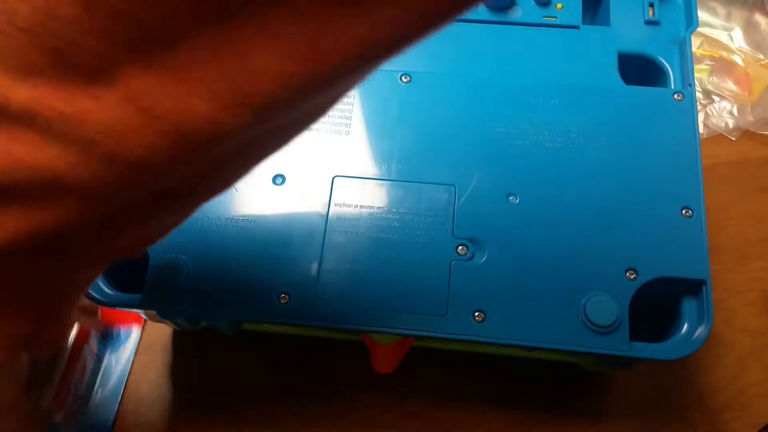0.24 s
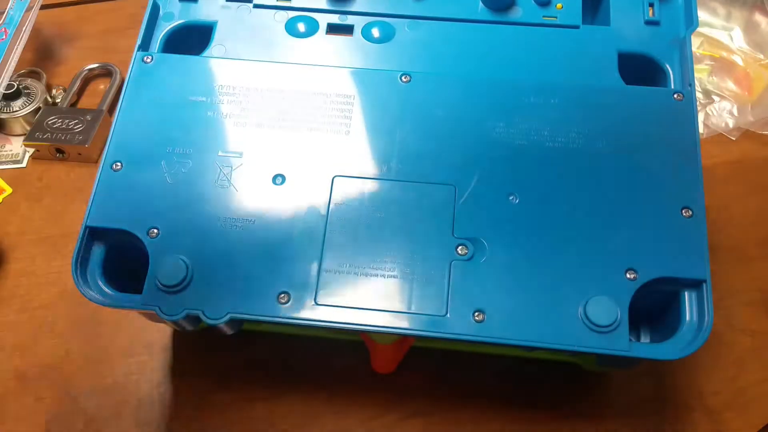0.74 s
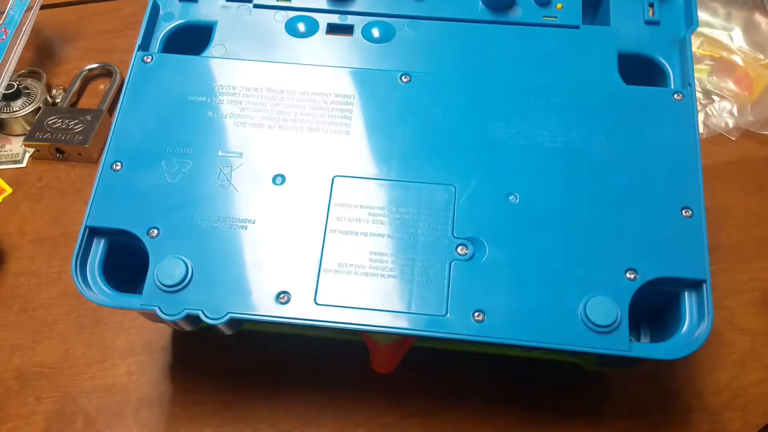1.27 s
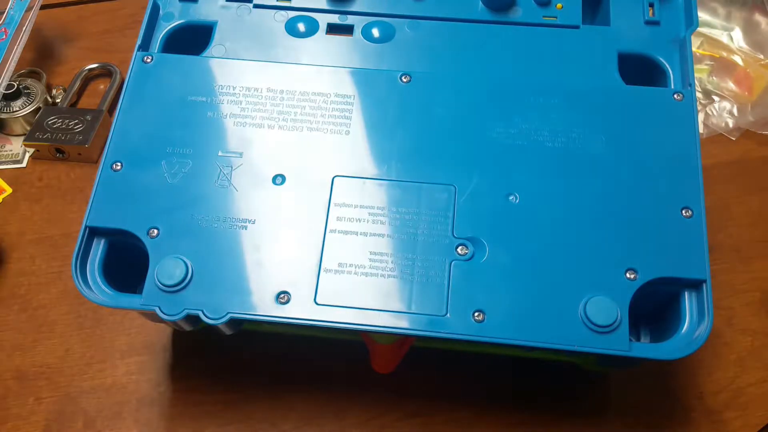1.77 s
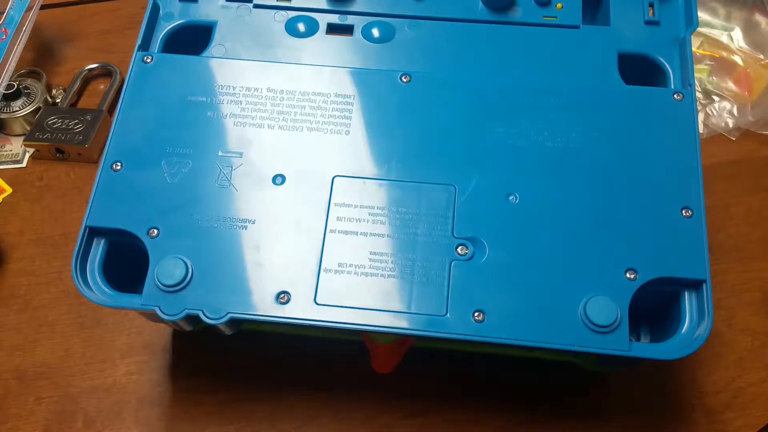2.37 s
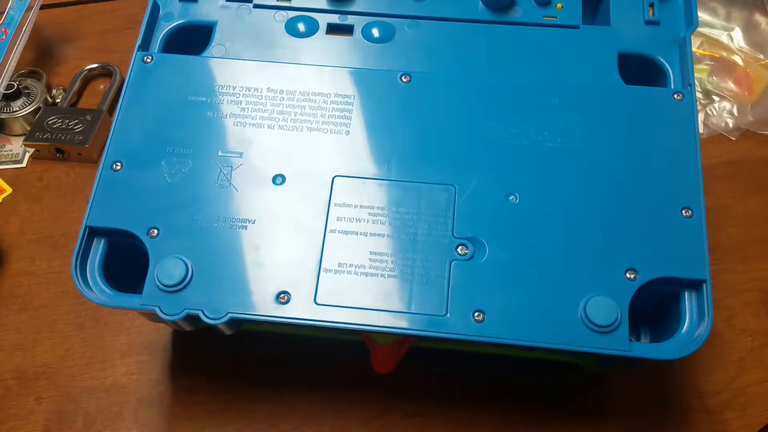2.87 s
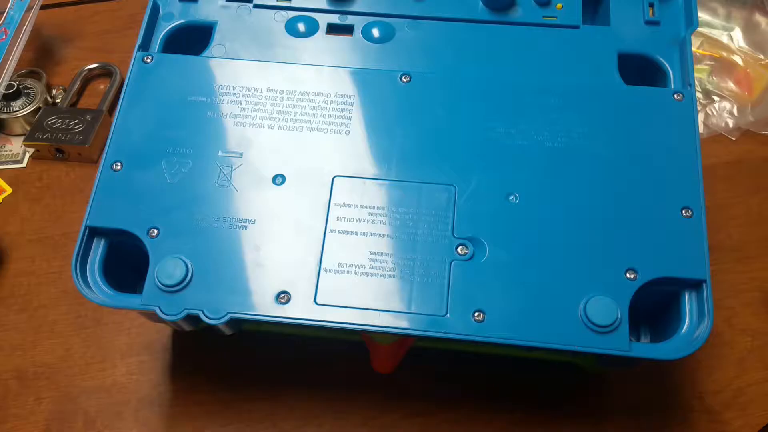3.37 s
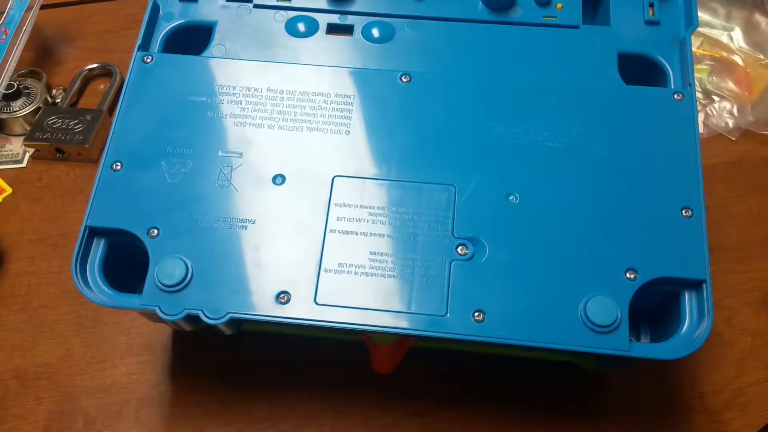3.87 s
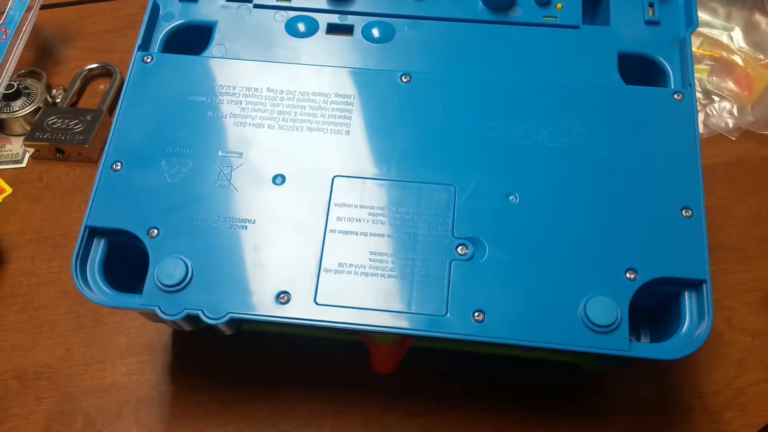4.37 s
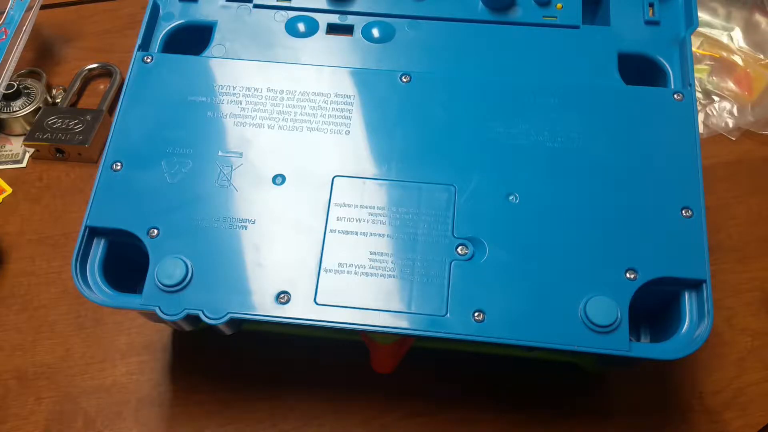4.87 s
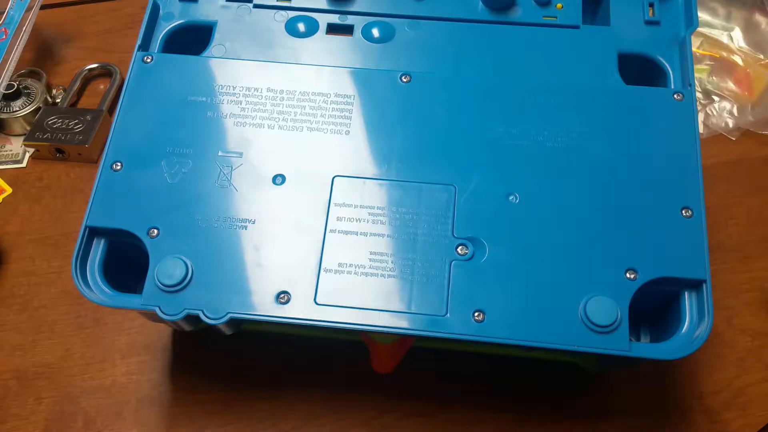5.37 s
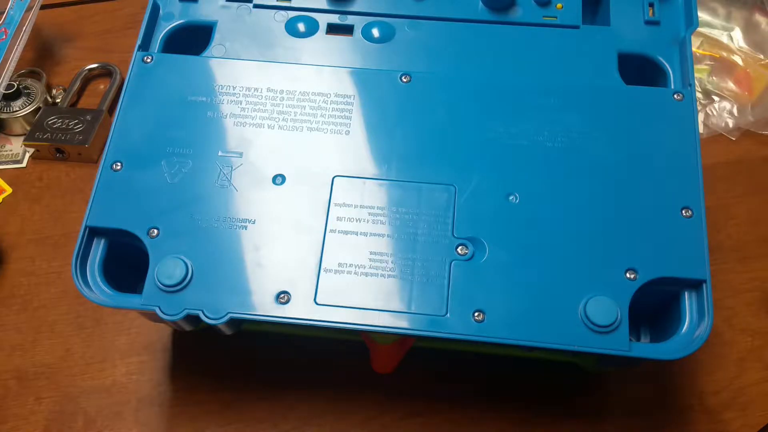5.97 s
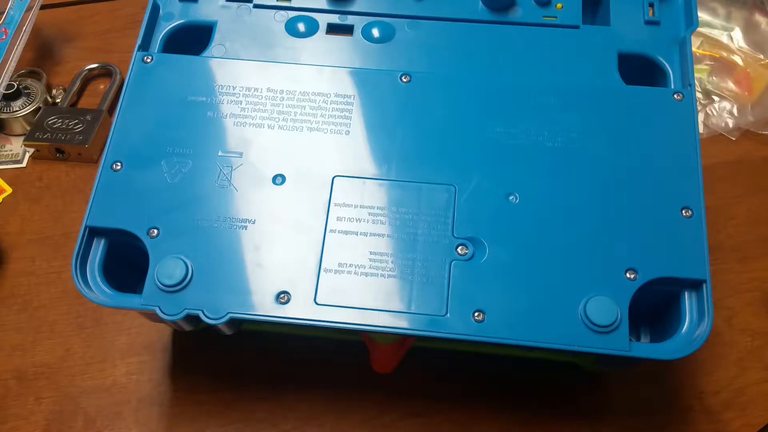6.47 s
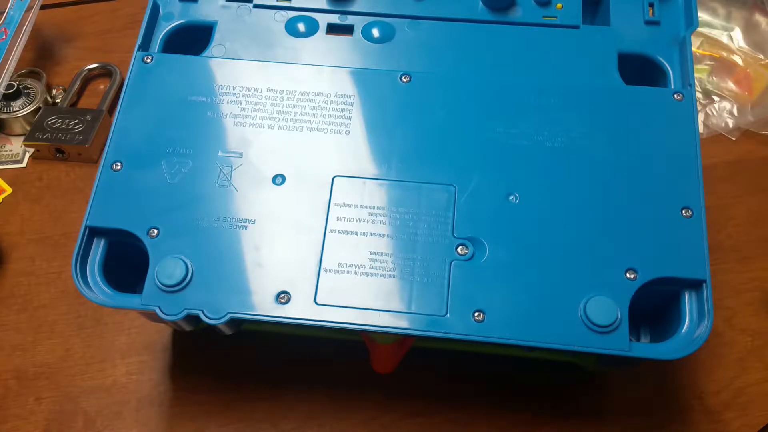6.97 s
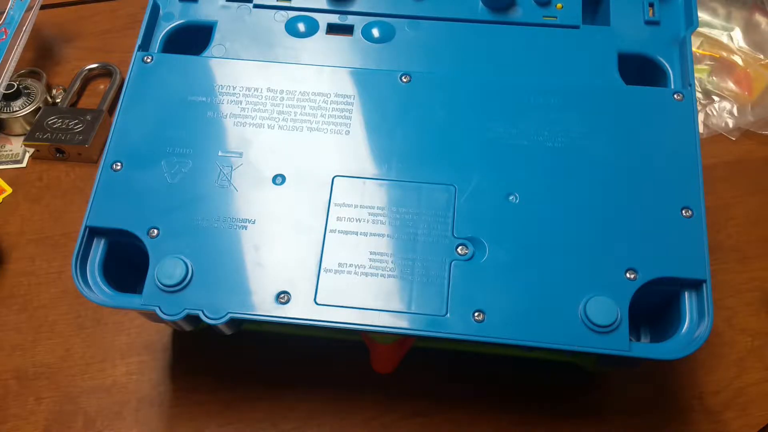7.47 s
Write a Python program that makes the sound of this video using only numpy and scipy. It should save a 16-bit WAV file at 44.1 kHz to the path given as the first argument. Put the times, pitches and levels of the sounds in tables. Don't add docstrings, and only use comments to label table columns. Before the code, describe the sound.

Close, dry handling noise: fingers brush lightly over packaging, then grip and bend it. Snaps start around two seconds, pause into rubbing and creaking, then grow dense and loud from the middle onward, as stiff plastic tears and card knocks dully. Small ticks and crinkles trail off at the end. Behind it lie soft room air and a distant motor hum; the loudest cracks slightly overload the microphone.

```python
import sys
import numpy as np
from scipy import signal
from scipy.io import wavfile

SR = 44100
rng = np.random.default_rng(int(sys.argv[2]) if len(sys.argv) > 2 else 0)


def gain_from_db(level_db):
    decades = np.asarray(level_db, float) / 20
    return 10 ** decades


def output_pcm(signal):
    pcm = np.clip(np.atleast_2d(signal).T, -1, 1) * 32767
    wavfile.write(sys.argv[1], SR, np.round(pcm).astype(np.int16))


N = 341276

# f/Hz, level/dB per Hz
AIR_SPECTRUM = [(25, -16), (60, -11), (82, -31), (100, -19), (130, -9), (220, -2.5), (330, -6.5),
                (450, -11), (1400, -25.5), (3300, -29.5), (7000, -35.5), (15000, -37.5), (16500, -58)]
AIR_DB = -55
# f/Hz, correlation
AIR_LIKENESS = [(60, .92), (130, .97), (280, .9), (600, .4), (15000, .1)]
# f/Hz, level/dB, width/Hz
HUM_LINES = [(59.5, -69, 4.4), (117.9, -61.5, 3.5), (160, -70.5, 3.1), (199.5, -59, 10.5), (234, -62, 8.7),
             (299, -60, 3.1)]
# f/Hz, t60/s
ROOM_DECAY = [(250, 0.086), (1000, 0.35), (3000, 0.22), (8000, 0.25), (15000, 0.16)]

# t/s, left minus right level/dB
PACK_PAN = [(0.0, 7.5), (0.56, -17), (0.6, 1), (1.55, -1), (1.68, -6.5), (2.54, -12.5), (3.23, -6),
            (5.17, -7.5), (5.62, -12), (6.12, -9.5), (7.74, -19)]
LIFTED_S = 1.7
PORT_LAG = 16

# f/Hz, width/Hz, level/dB
CARD_MODES = [(322, 940, 7), (577, 820, 20.5), (800, 1230, 12.5)]
SHELL_MODES = [(1300, 2400, 3), (2410, 2650, 4.5), (3540, 2200, -4)]
SCUFF_MODES = [(6500, 2300, 17.5), (9700, 3800, 11.5), (12500, 20200, 11)]
TABLE_MODES = [(136, 110, -8), (151.5, 28, 0), (224.4, 188, 7.5)]

# t/s, length/s, f/Hz, width/Hz, level/dB
GROANS = [(1.686, 0.024, 450, 97.2, -45.5), (4.885, 0.024, 766, 150, -34.5), (5.494, 0.1, 2410, 400, -36.5),
          (5.54, 0.0906, 496, 40, -32), (5.84, 0.22, 156, 24.6, -42), (6.716, 0.13, 120, 32.41, -42.5),
          (6.72, 0.17, 295, 80, -42), (7.501, 0.041, 800, 300, -36.5), (2.93, .06, 110, 30, -49),
          (2.965, .06, 210, 40, -49), (3.22, .12, 230, 30, -47), (3.25, .07, 70, 30, -55),
          (3.72, .16, 504, 20, -40), (3.73, .13, 690, 60, -39), (4.03, .07, 70, 30, -55),
          (4.1, .06, 700, 250, -41), (4.32, .06, 450, 200, -36), (3.49, .04, 330, 300, -39),
          (6.7, .14, 55, 25, -54), (7.225, .06, 3350, 600, -43), (2.096, .022, 850, 120, -35),
          (6.72, .18, 420, 250, -42), (3.53, .06, 5600, 900, -45), (4.215, .08, 650, 200, -38)]

# t/s of deepest bend, level/dB, rise/s, fall/s
FLEXES = [(0, -43.5, .1, 0.29), (1.05, -52, 0.27, 1), (1.376, -46.5, 0.14, .065),
          (2.045, -51.5, 0.11, 0.037), (2.19, -54.5, 0.26, 0.38), (2.386, -42, .03, 0.068),
          (2.628, -53.5, 0.21, 0.13), (3.0, -44, .12, 0.23), (3.266, -39, 0.054, .17),
          (3.501, -38, 0.022, 0.23), (3.783, -31, 0.11, 0.17), (4.131, -36, .04, 0.088),
          (4.22, -32, 0.04, 0.15), (4.335, -35.5, .015, 0.11), (4.508, -42, 0.099, 0.24),
          (4.687, -36, 0.091, 0.1), (4.8, -51, .08, 0.021), (4.902, -45, .02, 0.17),
          (5.08, -39.5, 0.24, 0.26), (5.19, -37, 0.024, 0.11), (5.583, -28, 0.064, 0.12),
          (5.78, -52, 0.098, .4), (5.973, -41.5, 0.099, 0.076), (6.45, -45, 0.3, 0.33),
          (6.587, -39, 0.03, .17), (6.787, -41.5, 0.12, .085), (6.905, -54, 0.14, 0.12),
          (7.104, -61, .04, .055), (7.29, -51, 0.016, .09), (7.524, -44.5, 0.14, 0.35)]
# t/s of fastest slide, rub level/dB, scuff level/dB, rise/s, fall/s
SLIDES = [(1.0, -51, -56, 0.53, 2.5), (1.376, -42.5, -44.5, 0.15, 0.1), (1.932, -46.5, -43, .16, 0.042),
          (2.16, -45.5, -46, 0.11, 0.22), (2.628, -38, -36, 0.19, 0.082), (2.95, -41.5, -48.5, 0.28, 0.27),
          (3.269, -39, -52, 0.07, 0.051), (3.784, -30, -35, 0.25, 0.12), (4.128, -36.5, -40, 0.04, 0.06),
          (4.687, -36.5, -60, 0.12, 0.094), (4.87, -43.5, -48.5, .15, 0.43),
          (5.584, -35.5, -36.5, 0.11, 0.043), (5.92, -38.5, -47, 0.14, 0.13), (6.72, -50, -44.5, .2, 0.15),
          (7.252, -42, -35, 0.054, 0.071), (7.358, -40.5, -43, 0.3, 0.79)]
# t/s, rub level/dB, scuff level/dB, fall/s
SLIPS = [(0, -48.5, -52.5, 0.5), (.984, -40, -52, 0.091), (2.045, -41, -53, .02), (2.395, -44, -60, 0.13),
         (3.5, -40, -46, 0.1), (3.545, -39, -39, 0.1), (4.21, -36, -38, .22), (4.508, -40, -40, 0.21),
         (5.095, -39, -35, 0.1), (5.19, -29, -33, 0.11), (5.497, -33.5, -34.5, 0.27),
         (5.769, -39.5, -46, 0.29), (6.12, -45, -45, 0.19), (6.351, -42, -39, 0.29),
         (6.587, -35.5, -41, 0.21), (6.905, -34, -38, 0.064), (7.11, -32, -34, 0.075),
         (7.524, -33, -38.5, 0.12)]
SLIP_RISE_S = 0.032
# t/s, level/dB, swell/s
THUDS = [(0, -43.5, 0.52), (1.376, -50, .06), (2.104, -54, 0.16), (2.5, -52, .15), (2.955, -51, 0.17),
         (3.28, -48, 0.057), (3.513, -31, 0.028), (3.612, -39.5, .17), (4.061, -52, 0.041), (4.3, -47, 1),
         (5.093, -41.5, 0.048), (5.249, -42, 0.14), (5.6, -39, 0.14), (5.822, -43, 0.2), (6.24, -42, 0.2),
         (6.6, -46.5, 0.6), (6.8, -39, 0.15), (7.195, -50, 0.054), (7.524, -58, 0.11)]
STROKE_DROP_DB = 15
REST_FLEX_DB, REST_RUB_DB, REST_SCUFF_DB, REST_THUD_DB = -80.5, -70, -65, -66

# t/s, peak level/dB, shell f/Hz, crack level/dB, card level/dB
KNOCKS = [(2.226, -12, 1850, -8, -7), (2.0985, -16, 3400, -12, 12), (4.4889, -16, 1860, -2.5, 1.5),
          (4.5148, -9.5, 3200, -2, 9.5), (4.534, -20, 2000, -10, 8), (5.035, -28, 2000, -12, 10),
          (4.7967, -15, 1960, -27, 1), (5.0713, -8.5, 3140, -10, 9), (5.1017, -6.5, 3380, -7.5, -8),
          (5.182, -5, 3450, -3.5, 4), (5.1935, -2.5, 4200, -2.5, -5), (5.1994, -6, 3460, 1, -8),
          (5.5252, -13, 4940, 8, 15), (5.939, -15.5, 2640, -7, -1), (5.9736, -14, 3230, -3, 12.5),
          (6.1011, -10, 3030, 8, -10), (6.115, -9, 2860, 17, -5), (7.4239, -12, 2860, -3, 1.5),
          (7.642, -13.5, 4670, 1.5, -5.5)]
# t/s, peak level/dB, shell f/Hz, crack level/dB, card level/dB
POPS = [(1.9767, -12.5, 2580, -18, 1.5), (2.0348, -7.5, 2000, -10.5, -4), (2.0495, -11, 1980, -12, 3.5),
        (2.3887, -5.5, 2470, -8.5, -2), (2.9025, -7.5, 1780, -7.5, -5.5), (3.9658, -5.5, 1870, -3, 9.5),
        (4.7876, -11.5, 3350, -18, -0.5), (5.7591, -7.5, 2020, -30, -6), (6.8458, -17.5, 4800, 7, -7),
        (6.8844, -13, 3400, 0, -14), (6.903, -16, 3980, -4, -8), (7.0932, -12, 1800, -23, -7),
        (7.3705, -9, 4080, 6.5, -6.5)]
FACE_HZ, EDGE_HZ = 960, 1402
# t/s, peak level/dB, shell f/Hz, crack level/dB
CRACKS = [(3.6844, -12.5, 5000, -8), (4.0415, -18.5, 2350, -20), (4.2165, -12.5, 3000, -14),
          (5.925, -21, 5000, 8), (5.9321, -19, 4700, -17), (5.963, -19.5, 2930, -30),
          (5.9949, -13, 2630, -30), (6.126, -13, 4790, 14), (6.9452, -7.5, 4530, 14),
          (7.0338, -9, 4700, 9.5), (7.1032, -14, 2800, -10), (7.2682, -14, 3400, -15),
          (7.3085, -21, 1490, 8), (7.5985, -14.5, 4180, -26)]
FREE_KNOCK_DB = -29
# t/s, peak level/dB, shell f/Hz
CREASES = [(2.624, -24, 1280), (2.637, -24.5, 1420), (2.8999, -20, 1800), (3.3844, -27, 1790),
           (3.7031, -19.5, 1960), (4.6792, -29, 1550), (4.793, -12.5, 1950), (4.895, -24.5, 1440),
           (5.1777, -12.5, 2720), (5.4996, -15, 2010), (6.5794, -19, 1800), (6.5862, -18, 1860),
           (7.342, -27, 1840), (7.507, -28, 1350), (7.5216, -19, 1560), (7.5657, -25, 3080),
           (7.5836, -23, 1580), (7.6933, -24, 1930)]
CREASE_BRIGHT_DB = -4.5
# t/s, peak level/dB, crack level/dB
TICKS = [(1.9624, -21, 21), (2.365, -15.5, 2), (2.552, -23.5, 3), (2.6193, -22, 13), (2.959, -21.5, -3),
         (3.6591, -23, 4), (4.082, -25.5, -4), (5.764, -24, 3), (5.8765, -17.5, -6), (5.906, -20.5, 0),
         (5.944, -21, 1), (6.136, -15.5, 12), (6.1426, -19, 13), (6.1483, -20.5, 9), (6.9089, -20, 8),
         (7.152, -20, 16), (7.1639, -22, 3), (7.2013, -22, -6), (7.2149, -21, 3), (7.2574, -21.5, -10),
         (7.301, -22, -5), (7.3236, -20, -2), (7.3466, -18, 5), (7.3513, -21.5, 2), (7.364, -19, 10),
         (7.5177, -17, -3)]
FILM_HZ, SEAM_HZ = 3480, 4200
# start t/s, end t/s, gap/s, peak level/dB, crack level/dB
PEELS = [
    (6.155, 6.186, 0.0057, -27, 9),
    (7.239, 7.247, .0039, -21.5, -5),
    (7.543, 7.551, .004, -23.5, -5),
]
# t/s, peak level/dB
SPECKS = [(1.8233, -41), (1.9182, -38), (2.5192, -33), (2.5694, -35), (3.4665, -44), (5.1714, -32),
          (5.461, -37), (5.4764, -38), (5.7009, -37), (5.7744, -33), (5.7824, -34), (5.7894, -33),
          (5.7954, -35), (5.8354, -35), (5.8404, -34), (5.8524, -35), (5.9155, -27), (6.4094, -34),
          (6.4144, -36), (6.4254, -36), (6.4384, -36), (6.4434, -37), (6.4634, -39), (6.4961, -38),
          (6.5044, -38), (6.5094, -38), (6.5144, -37), (6.6864, -40), (6.6924, -38), (6.7037, -34),
          (6.7306, -37), (6.755, -38), (7.1324, -31), (7.2204, -33), (7.2284, -31), (7.272, -25),
          (7.3114, -34), (7.3164, -32), (7.3844, -32), (7.7094, -36)]
SPECK_DB, SPECK_BRIGHT_DB, SPECK_CRACK_HZ = 5, 10, 7400
# t/s, peak level/dB, shell f/Hz
FLICKS = [(3.0574, -36, 2090), (3.1971, -42, 2510), (3.2625, -35, 3050), (3.496, -34, 2610),
          (3.5414, -30, 5420), (3.5554, -29, 5650), (3.8004, -25, 3090), (3.8144, -27, 2570),
          (3.9904, -37, 5000), (4.0494, -32, 2440), (4.0574, -29, 2470), (4.1056, -37, 2540),
          (4.123, -32, 2540), (4.1964, -33, 2050), (4.2114, -29, 2940), (4.3614, -38, 5500),
          (4.4214, -40, 2350), (4.4614, -38, 4500), (5.0429, -39, 2760), (5.8092, -27, 2800),
          (5.8244, -31, 3800), (5.8944, -26, 4820), (6.3924, -32, 3000), (6.5276, -35, 3500),
          (7.0718, -27, 5900), (7.1374, -31, 3440), (7.1764, -25, 3130), (7.3044, -28, 3440),
          (7.4154, -31, 2770), (7.4514, -31, 3140), (7.4764, -32, 2570), (7.5934, -28, 2670),
          (7.6384, -26, 2400), (7.6745, -32, 2360)]
FLICK_DB, FLICK_BRIGHT_DB, FLICK_LATE_S = 5, -8, 0.0007
# t/s, peak level/dB, shell f/Hz, crack level/dB, crack f/Hz
BANGS = [(6.3363, -2.5, 1750, 9, 6500), (6.5764, -2, 1900, 1, 5300), (6.5788, -6, 1900, -8, 6800),
         (5.4916, -4.5, 2300, -3, 4500), (4.8123, -5, 2900, 3, 5000), (4.5078, -8, 2270, -1, 5000),
         (4.669, -4, 2300, 1, 3700), (0.9741, -9, 1300, -11, 3200), (3.7715, -13, 2480, 2, 5400),
         (3.8396, -14.5, 2900, 2, 5000), (6.794, -11.5, 3350, -4, 5000), (2.0956, -8, 3450, -3, 5600)]
BANG_KNOCK_DB = -9
BANG_TOP_DB, SPECK_TOP_DB = -16, -5


def evened(x):
    return x / np.sqrt(np.mean(x ** 2) + 1e-20)


def read(points, hz):
    f, value = np.transpose(points)
    return np.interp(np.log(hz + 1), np.log(f + 1), value)


def add(mix, s, sound):
    part = mix[round(s * SR):][:len(sound)]
    part += sound[:len(part)]


def resonate(x, hz, width):
    b, a = signal.iirpeak(hz, hz / width, SR)
    return signal.lfilter(b, a, signal.lfilter(b, a, x))


def band(x, lo_hz, hi_hz):
    return signal.sosfilt(signal.butter(2, [lo_hz, hi_hz], "band", fs=SR, output="sos"), x)


def air():
    frames, hz = N // 512 + 5, np.fft.rfftfreq(2048, 1 / SR)
    a, b, c, d = rng.standard_normal((frames, 1025, 4)).T
    same = np.clip(read(AIR_LIKENESS, hz), -1, 1)[:, None]
    left = a + 1j * b
    right = same * left + np.sqrt(1 - same ** 2) * (c + 1j * d)
    spectra = np.array([left, right]) * gain_from_db(read(AIR_SPECTRUM, hz))[:, None]
    tone = signal.istft(spectra, nperseg=2048, noverlap=1536)[1][:, :N]
    return gain_from_db(AIR_DB - 2.5) * evened(tone)


def hum():
    t, out = np.arange(N) / SR, 0
    for hz, db, width in HUM_LINES:
        waver = evened(resonate(rng.standard_normal(N), hz, width))
        out = out + gain_from_db(db) * (np.sin(2 * np.pi * hz * t) + 0.4 * waver)
    return out * gain_from_db(np.array([[.8], [-.8]]))


def tail():
    taps = np.zeros((2, SR // 2))
    jitter = rng.integers(0, 20, (2, (SR // 2 - 121) // 20))
    at = np.arange(120, SR // 2 - 20, 20) + jitter
    np.put_along_axis(taps, at, rng.choice([-1., 1.], at.shape), 1)
    hz, t, z = signal.stft(taps, SR, nperseg=256)
    decay = gain_from_db(-60 * t / read(ROOM_DECAY, hz)[:, None])
    echo = signal.istft(z * decay, SR, nperseg=256)[1]
    return echo / np.linalg.norm(echo[0])


def room(x):
    turn = 2 * np.pi * 2.3 * np.arange(N) / SR
    out = 0
    for k in range(3):
        share = np.sqrt(2 / 3) * np.cos(turn / 2 + k * np.pi / 3)
        out = out + signal.oaconvolve(x[1:] * share, tail()[:, :SR // 3], axes=1)[:, :N]
    return out


def groans():
    out = np.zeros(N)
    for s, length, hz, width, db in GROANS:
        ring = resonate(rng.standard_normal(SR // 2), hz, width)[-round(length * SR):]
        add(out, s, gain_from_db(db) * evened(ring) * np.hanning(len(ring)))
    return out


def ports(x, shade_db):
    t = np.arange(N) / SR
    pan_db = np.interp(t, *np.transpose(PACK_PAN)) + shade_db
    late = np.where(t > LIFTED_S, np.roll(x, PORT_LAG), x)
    bass = signal.lfilter([.14], [1, -.86], late)
    treble = np.diff(late, prepend=0)
    bent = .3 * np.roll(treble, 29)
    return np.array([bass + (late - bass + bent) * gain_from_db(pan_db), x])


def strokes(s, db, rise, fall, rest_db):
    t = np.arange(0, N / SR + .01, .002)[:, None]
    before = (s - t) / np.maximum(rise, .005)
    after = (t - s) / np.maximum(fall, .005)
    away = np.where(t < s, before, after)
    power = (gain_from_db(db - STROKE_DROP_DB * away) ** 2).sum(1) + gain_from_db(rest_db) ** 2
    return np.interp(np.arange(N) / SR, t[:, 0], 10 * np.log10(power))


def friction(level_db, modes, per_s, spread_db, smooth, shade_db):
    sizes = gain_from_db(spread_db * np.minimum(rng.exponential(1, N), 4))
    slips = sizes * (rng.random(N) < per_s / SR)
    slips[:round(LIFTED_S * SR)] /= 4
    clicks = evened(slips * rng.standard_normal(N))
    drive = clicks + smooth * rng.standard_normal((2, N))
    ringing = sum(gain_from_db(db) * resonate(drive, hz, width) for hz, width, db in modes)
    left, right = evened(ringing) * gain_from_db(level_db)
    return np.array([ports(1.33 * left + 0.077 * right, shade_db)[0], right])


def hands():
    slips = [(s, rub, scuff, SLIP_RISE_S, fall) for s, rub, scuff, fall in SLIPS]
    s, rub, scuff, rise, fall = np.transpose(list(SLIDES) + slips)
    at, push, swell = np.transpose(THUDS)
    flex_db = strokes(*np.transpose(FLEXES), REST_FLEX_DB)
    rub_db = strokes(s, rub, rise, fall, REST_RUB_DB)
    scuff_db = strokes(s, scuff, rise, 0.74 * fall, REST_SCUFF_DB)
    thud_db = strokes(at, push, swell, swell, REST_THUD_DB)
    card = friction(flex_db - 1.5, CARD_MODES, per_s=500, spread_db=3.3, smooth=.7, shade_db=2.5)
    shell = friction(rub_db - 5.5, SHELL_MODES, per_s=900, spread_db=4.2, smooth=1.0, shade_db=1.0)
    fine = friction(scuff_db - 6.0, SCUFF_MODES, per_s=1400, spread_db=4.5, smooth=1.0, shade_db=-2.9)
    table = friction(thud_db - 3.5, TABLE_MODES, per_s=300, spread_db=2.5, smooth=1.0, shade_db=0.59)
    return card + shell + fine + table[1]


def splinters(count):
    t = np.arange(500) / SR
    burst = 0.15 * rng.standard_normal((count, len(t))) * (t / 0.00071) * np.exp(-t / 0.0008)
    burst[:, 26] += 1
    shell, card, crack = band(burst, 1994, 3740), band(burst, 660, 1680), band(burst, 10670, 19200)
    return zip(burst, shell, card, crack)


def snap(parts, peak_db, mode_hz, bright_db, card_hz=1000, card_db=-14, crack_hz=5880, top_db=-8.5):
    burst, mid, low, high = parts
    shell = evened(resonate(burst, mode_hz, 0.36 * mode_hz)) + 0.7 * evened(mid)
    card = evened(resonate(burst, card_hz, 0.56 * card_hz)) + 0.25 * evened(low)
    edge = resonate(burst, crack_hz, 0.33 * crack_hz)
    crack = evened(edge) + gain_from_db(top_db + 0.85 * bright_db) * evened(high)
    x = evened(shell) + gain_from_db(card_db) * card + gain_from_db(bright_db) * evened(crack)
    return gain_from_db(peak_db + 2.7) * x / abs(x).max()


def snaps():
    rows = [(s, db, hz, bright, FACE_HZ, card) for s, db, hz, bright, card in KNOCKS]
    rows += [(s, db, hz, bright, EDGE_HZ, card) for s, db, hz, bright, card in POPS]
    rows += [(*row, EDGE_HZ, FREE_KNOCK_DB) for row in CRACKS]
    rows += [(*row, CREASE_BRIGHT_DB) for row in CREASES]
    rows += [(s, db, FILM_HZ, bright) for s, db, bright in TICKS]
    for start, end, gap, db, bright in PEELS:
        rows += [(s, db, SEAM_HZ, bright) for s in np.arange(start, end, gap)]
    free = (EDGE_HZ, FREE_KNOCK_DB)
    for s, db in SPECKS:
        rows.append((s + FLICK_LATE_S, db + SPECK_DB, FILM_HZ, SPECK_BRIGHT_DB, *free,
                     SPECK_CRACK_HZ, SPECK_TOP_DB))
    for s, db, hz in FLICKS:
        rows.append((s + FLICK_LATE_S, db + FLICK_DB, hz, FLICK_BRIGHT_DB, *free))
    for s, db, hz, bright, crack_hz in BANGS:
        rows.append((s, db, hz, bright, FACE_HZ, BANG_KNOCK_DB, crack_hz, BANG_TOP_DB))
    out = np.zeros(N)
    for row, parts in zip(rows, splinters(count=220)):
        add(out, row[0] - .0005, snap(parts, *row[1:]))
    return ports(out, 0.049)


def scene():
    pops, rubs = snaps(), hands()
    answer = room(gain_from_db(-14.5) * pops + gain_from_db(-4.5) * rubs)
    return air() + hum() + answer + groans() + rubs + pops


def band_limit(x):
    return signal.sosfilt(signal.butter(12, 16670, fs=SR, output="sos"), x)


def record(dry):
    soft = np.tanh(dry * 1.01) / 1.074
    edge = signal.firwin(255, 15700, fs=SR)
    mix = signal.oaconvolve(soft, edge[None], "same") - .0006
    return band_limit(mix)


dry = scene()
out = record(dry)
output_pcm(out)
```